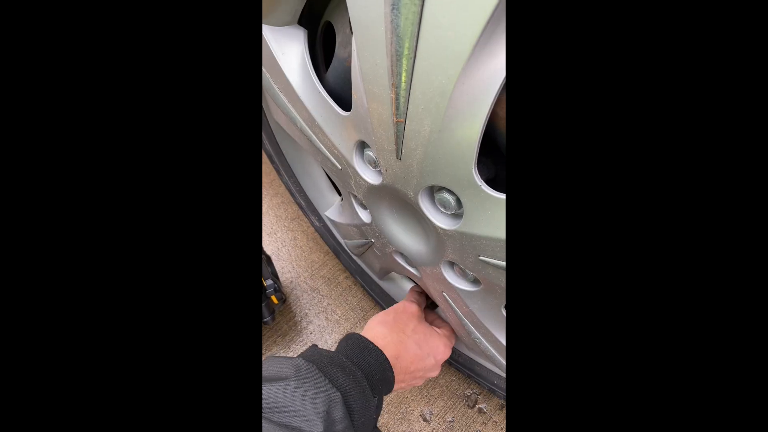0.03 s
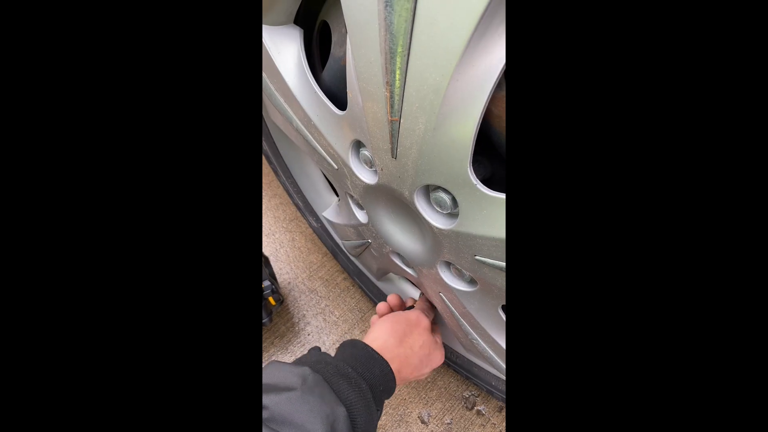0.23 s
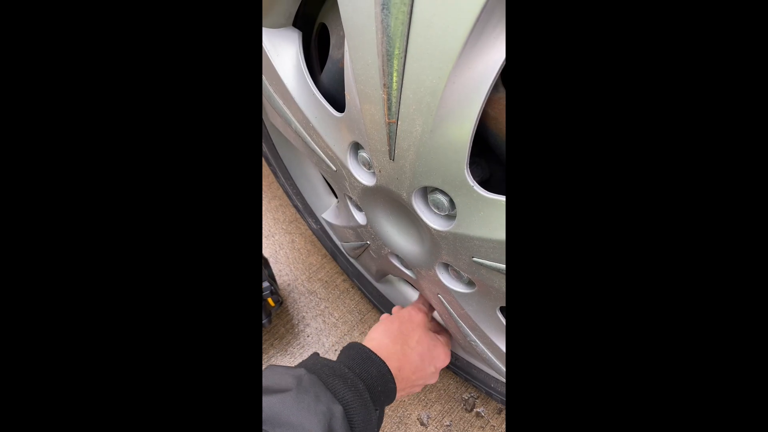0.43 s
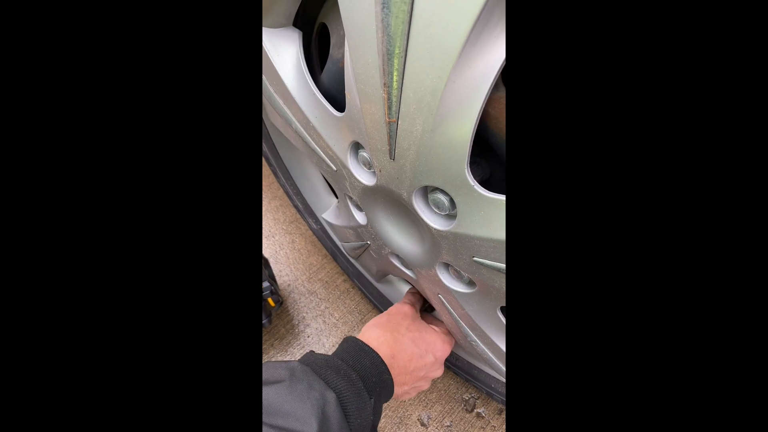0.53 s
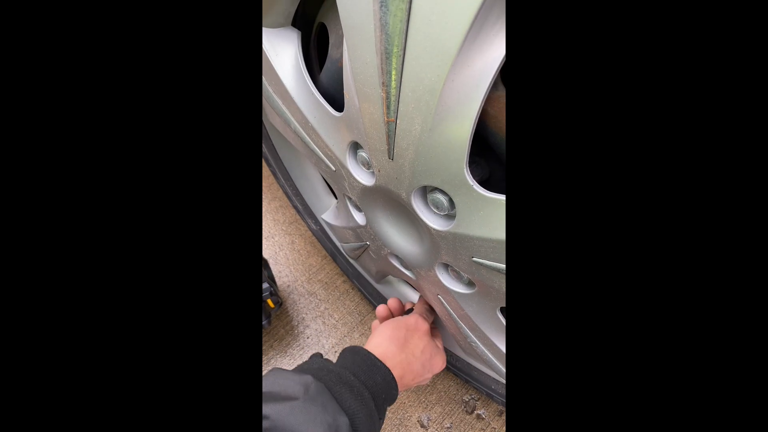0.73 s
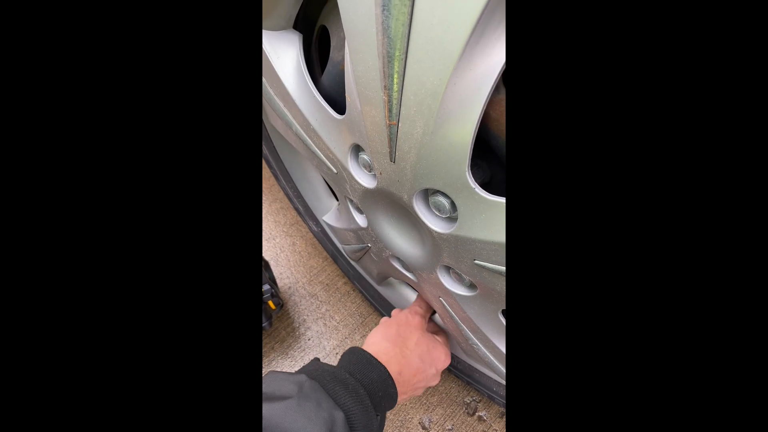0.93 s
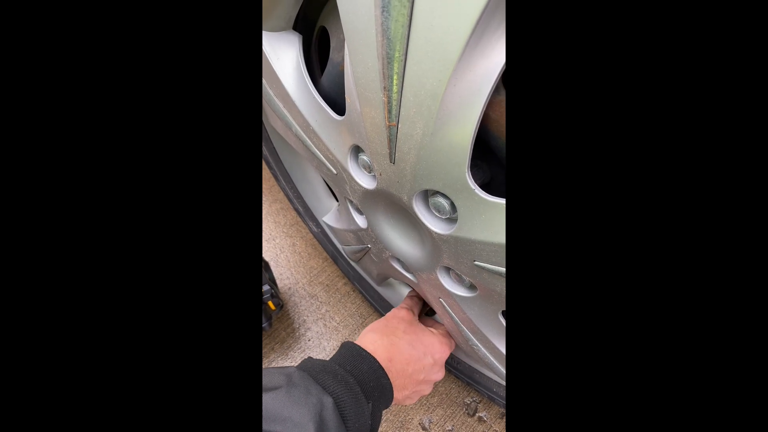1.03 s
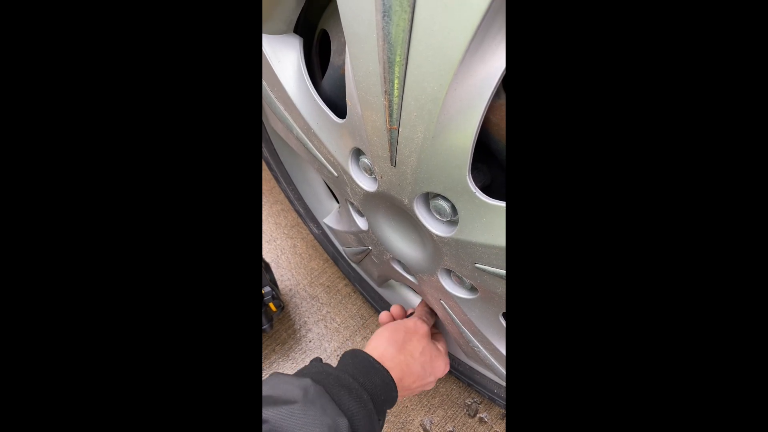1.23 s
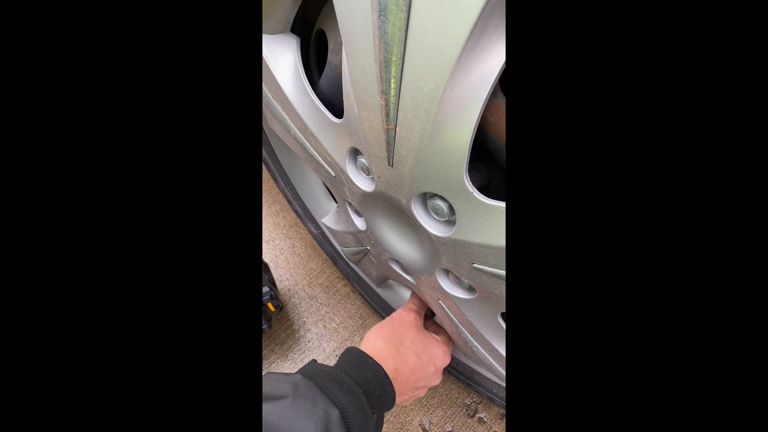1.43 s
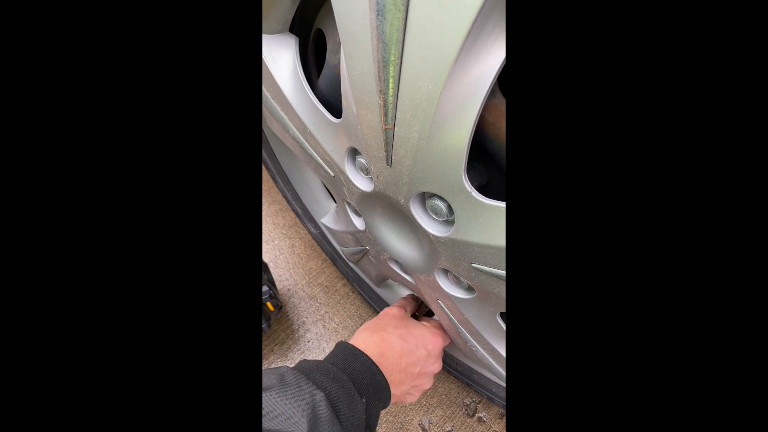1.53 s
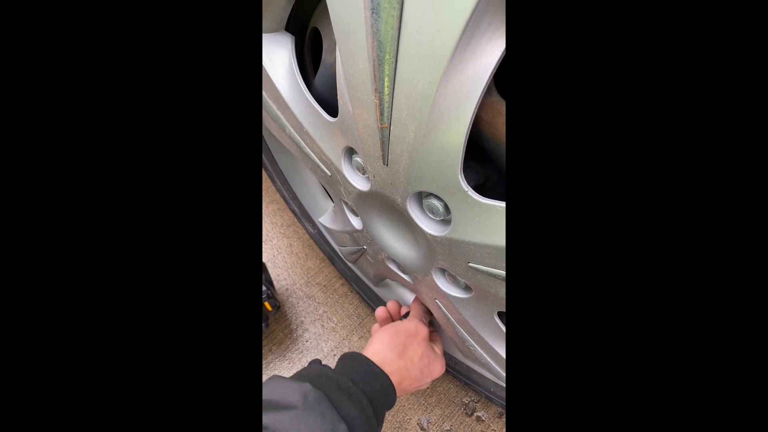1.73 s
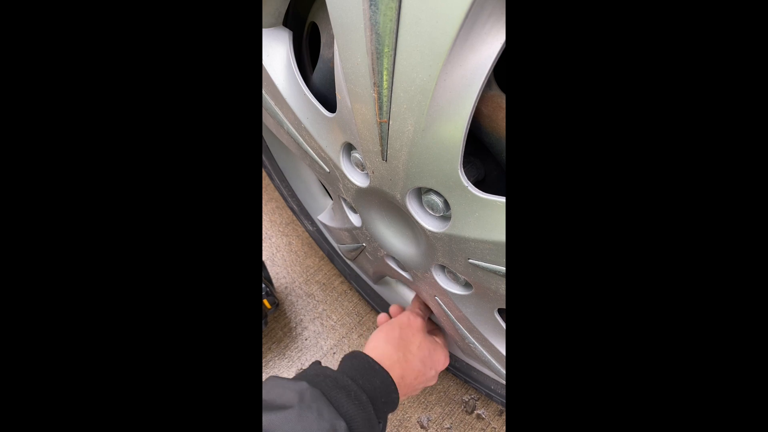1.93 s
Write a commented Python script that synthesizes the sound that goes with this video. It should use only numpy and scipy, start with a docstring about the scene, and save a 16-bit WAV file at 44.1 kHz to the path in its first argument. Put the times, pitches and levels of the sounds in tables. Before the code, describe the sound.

A high hiss of air leaks from a tire valve, swelling, then dropping as it seals.

```python
"""A bright hiss swells with each turn as a hand screws an inflator hose onto a tyre valve outdoors.
It is air leaking past the thread, and it dies down when the seal closes. Fingers rub on the fitting,
a hand's grip ticks softly, and outdoor air, a distant rumble and a hum lie below.
The treble waves are out of step between left and right, by an amount that depends on pitch."""
import sys
import numpy as np
from scipy import signal
from scipy.fft import rfft, irfft
from scipy.io import wavfile

SR = 44100
rng = np.random.default_rng(int(sys.argv[2]) if len(sys.argv) > 2 else 0)


def generate_wav(sig):
    """Save sig (samples, or channels by samples) to the path in sys.argv[1] as 16-bit PCM at SR."""
    pcm = np.round(np.clip(np.atleast_2d(sig).T, -1, 1) * 32767).astype(np.int16)
    wavfile.write(sys.argv[1], SR, pcm)


N = 88200
FREQS_HZ = np.arange(N // 2 + 1) * SR / N
LOW_CUT_HZ, HIGH_CUT_HZ = 38, 15750

# How the leak swells: t/s, relative level/dB, then against the jet: whistle/dB, ring/dB, top treble/dB
LEAK_LEVELS = [(0, -86, -12, -22, 1), (.04, -77, -10, -16, 12), (.08, -102, -19, -19, 13),
               (.13, -71, -16, -5, 10), (.195, -69.5, -25, -22, -5), (.215, -62, -25, -5, -4),
               (.25, -59, -26, -12, -3), (.36, -58, -1, -12, 4), (.5, -55, -13, -15, 3),
               (.57, -54.5, -1.5, -18, 4), (.64, -50.5, -0.5, -20, -3), (.7, -45.5, 0, -13.5, 3),
               (.75, -39.5, -18, -14.5, 7.5), (.8, -39, -2.5, -11.5, 5.5), (.86, -37.5, -1.5, -14, 5),
               (.93, -41, -4.5, -17, 6), (.98, -43.5, -7, -14.5, 8.5), (1.04, -37.5, -2.5, -32, 5),
               (1.1, -39, -4.5, -26, 6.5), (1.19, -37.5, -1, -21, 7), (1.24, -37, -5, -13, 8),
               (1.29, -37.5, -17, -10, 7), (1.35, -39.5, -2.5, -12, 11.5), (1.41, -40, -8, -16, 6),
               (1.48, -44.5, -4, -17, 11), (1.54, -40, -4, -28, 13), (1.6, -40, -6, -17, 11.5),
               (1.67, -38.5, -2, -20, 7.5), (1.7, -43.5, -1, -25, -6), (1.74, -57, -21, -8, 3),
               (1.81, -61.5, -18, -19, 2), (1.86, -80, -9, -5, 3), (1.91, -60, -26, -12, 4.5),
               (2, -59.5, -20, -9, -3)]
# Tone colour of the air jet: f/Hz, level/dB
JET_COLOUR = [(700, -40), (1500, -27.5), (2250, -20), (2850, -20), (3400, -16), (3800, -15.5), (4200, -12),
              (4700, -13.5), (5300, -14.5), (6300, -6), (6900, -5.5), (7600, -4), (8500, -5), (10000, -7.5),
              (11000, -8), (12000, -8), (14000, -9.5), (15500, -12)]
# Pitch of the whistle in the gap: t/s, f/Hz
GAP_PITCH = [(0, 9450), (.45, 9530), (.68, 8840), (.84, 10260), (.95, 9840), (1.05, 8150), (1.19, 8810),
             (1.3, 8665), (1.45, 8184), (1.6, 8460), (1.72, 9000), (2, 9380)]

def leak():
    """Air hisses through the thread's gap, whistles in it and makes the fitting ring."""
    level_db, whistle_db, ring_db, top_db = curves(LEAK_LEVELS)
    gap_hz, = curves(GAP_PITCH)
    jet = coloured_noise(JET_COLOUR, wander_db=3.14, rate=3.8, bands=40)
    top = irfft(rfft(jet) / (1 + (11500 / (FREQS_HZ + 1)) ** 10), N)  # the part above 11500 Hz
    jet = jet + (from_db(top_db) - 1) * top
    whistle = from_db(whistle_db) * noise_band(gap_hz, width_hz=1410)
    broad_whistle = from_db(whistle_db - 10.5) * noise_band(0.95 * gap_hz, width_hz=3500)
    ring = from_db(ring_db) * noise_band(5300, width_hz=550)
    flutter_db = 0.69 * drift(30)
    return from_db(level_db + 3 + flutter_db) * (jet + whistle + broad_whistle + ring)


# How loud the fingers rub: t/s, relative level/dB
RUB_LEVELS = [(0, -64), (.04, -72.5), (.08, -74.5), (.13, -69), (.17, -71), (.22, -61), (.27, -66.5),
              (.31, -62.5), (.36, -68), (.42, -63.5), (.5, -66.5), (.58, -71), (.63, -65.5), (.68, -68),
              (.74, -56), (.85, -61.5), (.96, -58), (1.1, -60.5), (1.27, -57), (1.34, -62), (1.45, -61),
              (1.6, -66.5), (1.7, -61.5), (1.76, -56.5), (1.81, -60.5), (1.86, -73), (1.9, -62.5),
              (1.94, -58.5), (2, -62.5)]
# Tone colour of the rubbing: f/Hz, level/dB
RUB_COLOUR = [(300, -4), (600, -1.5), (1100, 0), (2200, -3), (3500, -9), (6000, -11), (10000, -16),
              (15500, -16)]
# A thin rasp within the rubbing: t/s, level/dB
RASP_LEVELS = [(0, -99), (.18, -79), (.2, -61.5), (.27, -81), (.32, -59), (.36, -92), (.7, -68),
               (.85, -54.5), (1.0, -69), (1.68, -92), (1.73, -60), (1.79, -66), (1.83, -99), (2, -76)]

def fingers():
    """Fingers slide on the fitting: a broad scuffing with short rasps."""
    rub_db, = curves(RUB_LEVELS)
    rasp_db, = curves(RASP_LEVELS)
    rub = from_db(rub_db + 3) * coloured_noise(RUB_COLOUR, wander_db=1.8, rate=8.0, bands=12)
    return rub + from_db(rasp_db) * noise_band(2324, width_hz=250)


# Soft ticks of the grip: t/s, starting level/dB
GRIP_TICKS = [(.024, -51), (0.099, -49), (0.283, -51.5), (.345, -51), (0.402, -50), (0.431, -51),
              (0.507, -49), (.650, -52), (0.771, -49), (0.871, -47), (1.177, -47)]

def grip():
    """A hand on the microphone's housing makes tiny thumps that fall in pitch, in stereo."""
    ticks, t = np.zeros(N + SR), np.arange(SR // 10) / SR
    pitch_hz = 110 + 480 * np.exp(-t / .004)
    fade = from_db(-60 * t / .045)  # 60 dB quieter after 45 ms
    tick = np.sin(2 * np.pi * np.cumsum(pitch_hz) / SR) * fade
    for start_s, level_db in GRIP_TICKS:
        start = int(start_s * SR)
        ticks[start:start + len(t)] += from_db(level_db) * tick
    return ticks[:N] * [[1], [-1]]  # the right side gets the wave upside down


# Tone colour of the outdoor air: f/Hz, level/dB
AIR_COLOUR = [(250, 17.5), (500, 24), (1000, 12.5), (1500, -8.5), (2000, -5), (4000, -29), (8000, -25),
              (15500, 4)]

def outdoor_air():
    """A faint, even rush of open air."""
    return from_db(-67) * coloured_noise(AIR_COLOUR, wander_db=1.5, rate=4.4, bands=6)


# How loud the rumble is: t/s, level/dB
RUMBLE_LEVELS = [(0.0, -49), (0.44, -51), (0.54, -54), (0.56, -52), (0.97, -50.5), (1.01, -49), (1.9, -52),
                 (2.0, -55.5)]
# Tone colour of the rumble: f/Hz, level/dB
RUMBLE_COLOUR = [(16, -23), (28, 2), (36, -7), (45, 0), (59, -3), (81, -3.5), (118, -8), (145, -10),
                 (210, -21), (300, -24), (390, -43), (660, -120)]

def rumble():
    """Deep noise from far away."""
    level_db, = curves(RUMBLE_LEVELS)
    return from_db(level_db) * coloured_noise(RUMBLE_COLOUR, wander_db=1.47, rate=1.0, bands=8)


# Loudness and pitch of the hum: t/s, level/dB, f/Hz
HUM_TONE = [(0, -60, 76.7), (.2, -53, 77.03), (.44, -51, 79), (.54, -62, 78.1), (.65, -53, 81.5),
            (.8, -55.5, 77.2), (.95, -47.5, 75.56), (1.05, -84, 76.8), (1.3, -56.5, 76.15),
            (1.46, -56.5, 78.94), (1.54, -67, 72.06), (1.64, -53.5, 80.6), (1.75, -56.5, 75.6),
            (1.9, -50.5, 71.3), (2, -57, 71.5)]

def hum():
    """One low tone that wavers."""
    level_db, pitch_hz = curves(HUM_TONE)
    phase = 2 * np.pi * np.cumsum(pitch_hz + 2.47 * drift(2.9)) / SR
    return from_db(level_db) * np.sqrt(2) * np.sin(phase)


# How left and right differ at each pitch: f/Hz, right's lag/half cycles, likeness/0-1, left minus right/dB
STEREO_IMAGE = [(20, 0, 1, 0), (100, 0, .999, 0), (300, 0, .8, 0), (800, .3, .25, 2.5),
                (1050, .15, .45, 4.2), (1450, .04, .8, 1), (1900, .04, .92, 0), (2600, .45, .3, 0),
                (3000, .05, .82, .5), (3750, .06, .82, .2), (4100, .3, .6, -2.4), (5200, .08, .9, .4),
                (5700, .3, .68, .5), (6500, .85, .8, 0), (6850, 1, 1, 0), (7650, 1, 1, 0),
                (8300, 1.28, .83, 0), (9300, 1.66, .83, 0), (9800, 2, 1, 0), (11000, 2, 1, 0),
                (11800, 2.4, .7, 0), (12500, 2.85, .8, 0), (12800, 3, 1, 0), (14300, 3, 1, 0),
                (15100, 3.55, .6, 0), (15700, 3.9, .78, 0)]

def stereo_image(pair):
    """Two signals become left and right: both sides share the first, the second sets them apart."""
    table_hz, *columns = np.transpose(STEREO_IMAGE)
    lag, likeness, balance_db = (np.interp(FREQS_HZ, table_hz, c) for c in columns)
    shared, apart = rfft(pair) * np.sqrt([(1 + likeness) / 2, (1 - likeness) / 2])
    half_shift = from_db(balance_db / 2) * np.exp(.5j * np.pi * lag)
    return irfft([(shared + apart) * half_shift, (shared - apart) / half_shift], N)


def from_db(db):
    """Turn decibels into a volume factor."""
    return 10 ** (np.asarray(db) / 20)


def unit_level(x):
    """Scale a signal to an average strength (rms) of 1."""
    return x / np.sqrt(np.mean(x ** 2) + 1e-20)


def curves(rows):
    """Join a table's points in time: one curve for each column after the first."""
    times, *columns = np.transpose(rows)
    return [np.interp(np.arange(N) / SR, times, c) for c in columns]


def drift(rate):
    """A smooth random wobble of about size 1; a higher rate wobbles faster."""
    pole = np.exp(-80 * np.pi * rate / SR)
    noise = rng.standard_normal(N // 40 + 2002)  # one value per 40 samples, plus a run-up
    slow = signal.lfilter([1], [1, -2 * pole, pole * pole], noise)[2000:]
    return np.interp(np.arange(N) / 40, np.arange(len(slow)), unit_level(slow - slow.mean()))


def coloured_noise(colour, wander_db, rate, bands):
    """Two unrelated noises of one tone colour, split into bands that each wander in level."""
    table_hz, table_db = np.transpose(colour)
    hz = FREQS_HZ + 1e-3
    octaves_below = np.maximum(-np.log2(hz / table_hz[0]), 0)
    colour_db = np.interp(np.log(hz), np.log(table_hz), table_db) - 24 * octaves_below
    spectrum = rfft(rng.standard_normal((2, N))) * from_db(colour_db)
    place = np.clip(np.log(hz / table_hz[0]) / np.log(table_hz[-1] / table_hz[0]), 0, 1) * (bands - 1)
    total = 0
    for k in range(bands):
        band = irfft(spectrum * np.maximum(1 - abs(place - k), 0), N)
        total = total + from_db(wander_db * drift(rate)) * band
    return unit_level(total)


def noise_band(centre_hz, width_hz):
    """Two unrelated noises gathered around a steady or moving pitch."""
    smooth = signal.butter(2, width_hz / 2, fs=SR, output="sos")
    a, b = signal.sosfilt(smooth, rng.standard_normal((2, 2, N)))
    phase = 2 * np.pi * np.cumsum(centre_hz + np.zeros(N)) / SR
    return unit_level(a * np.cos(phase) + b * np.sin(phase))


def scene():
    """Leak, fingers and background are spread between left and right; the grip's ticks are added."""
    return stereo_image(leak() + fingers() + outdoor_air() + rumble() + hum()) + grip()


def record(dry):
    """The deepest bass is turned down and the highest treble is cut steeply."""
    low_cut = signal.butter(5, LOW_CUT_HZ, "high", fs=SR, output="sos")
    high_cut = signal.ellip(12, .1, 80, HIGH_CUT_HZ, fs=SR, output="sos")
    return signal.sosfilt(high_cut, signal.sosfilt(low_cut, dry))


dry = scene()
out = record(dry)
generate_wav(out)
```